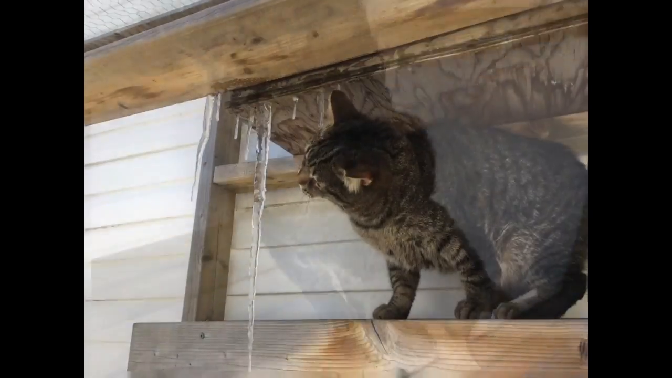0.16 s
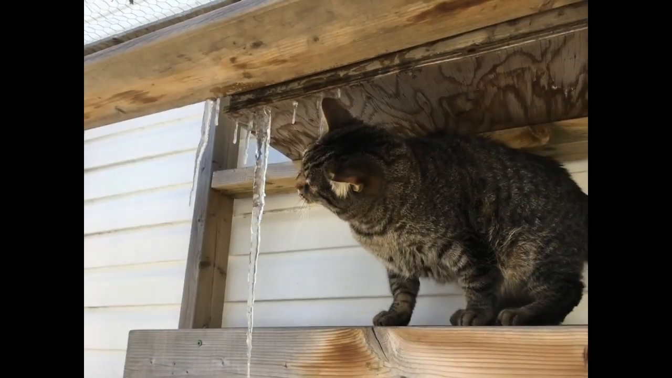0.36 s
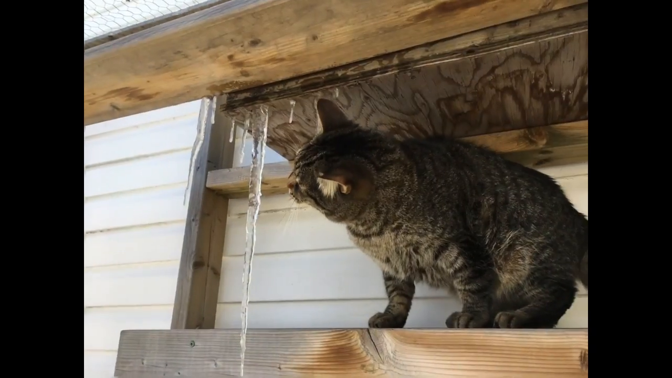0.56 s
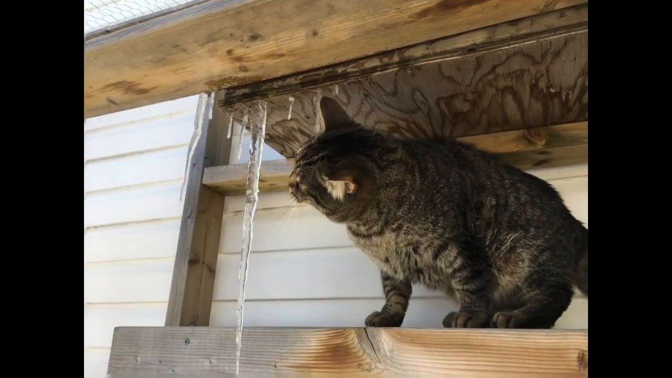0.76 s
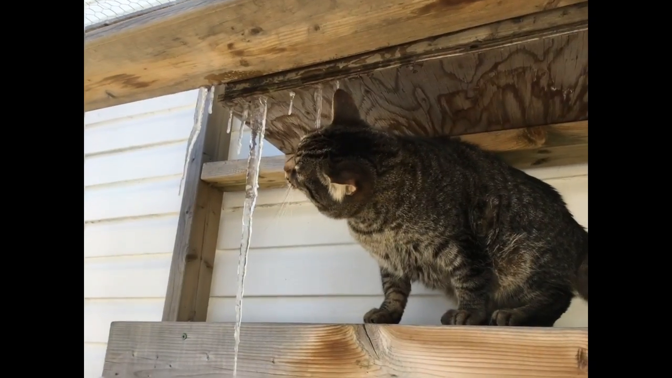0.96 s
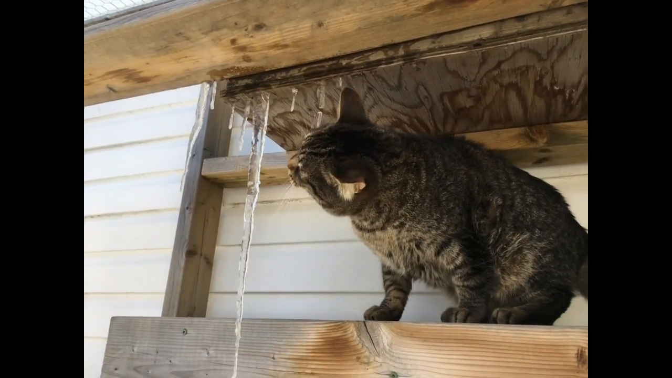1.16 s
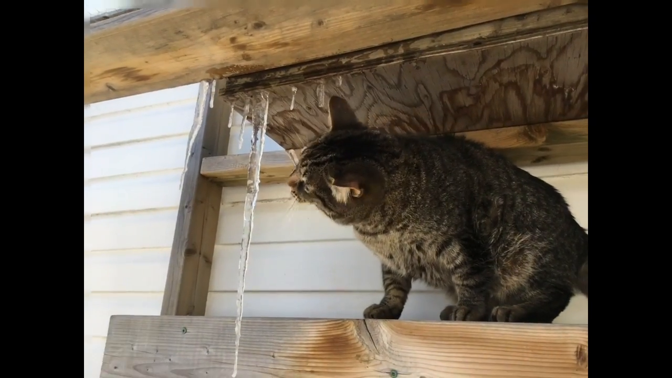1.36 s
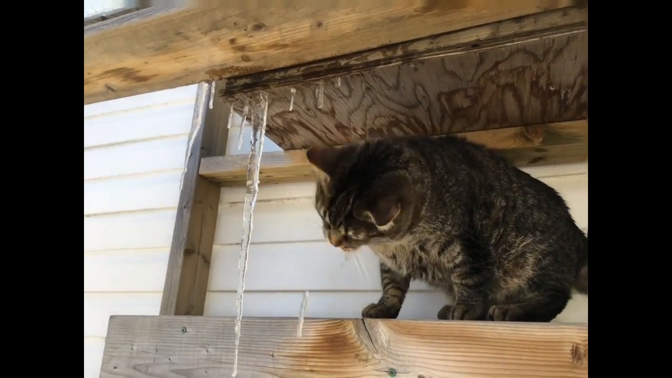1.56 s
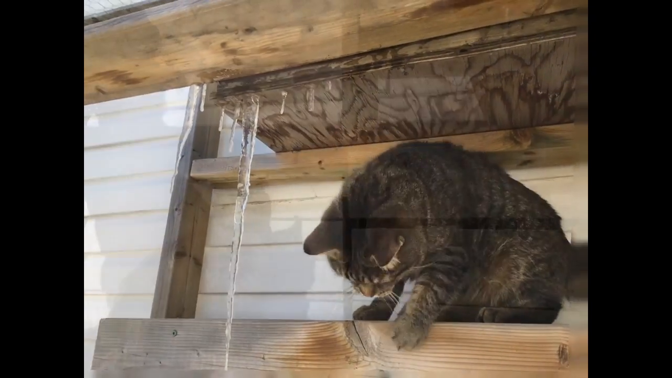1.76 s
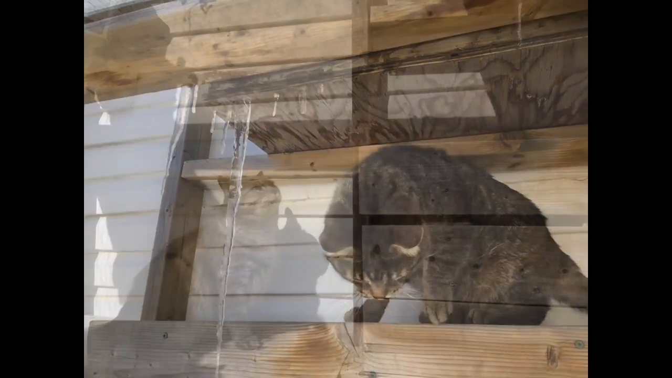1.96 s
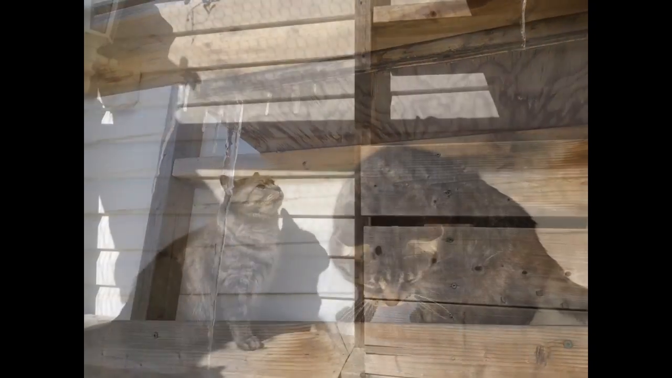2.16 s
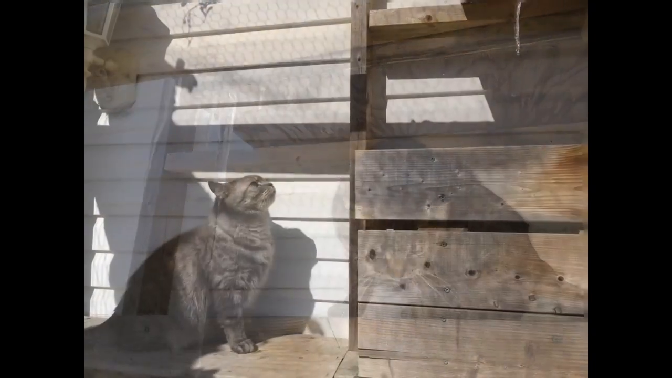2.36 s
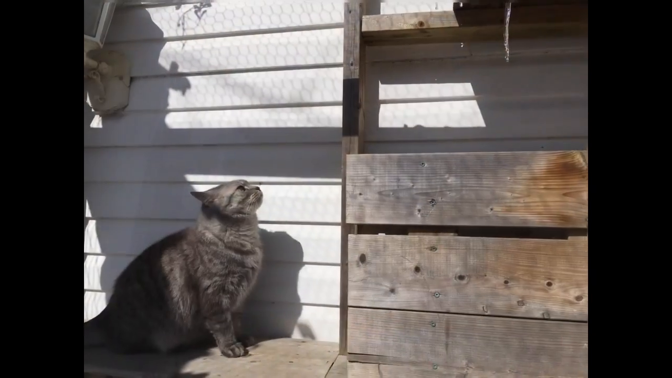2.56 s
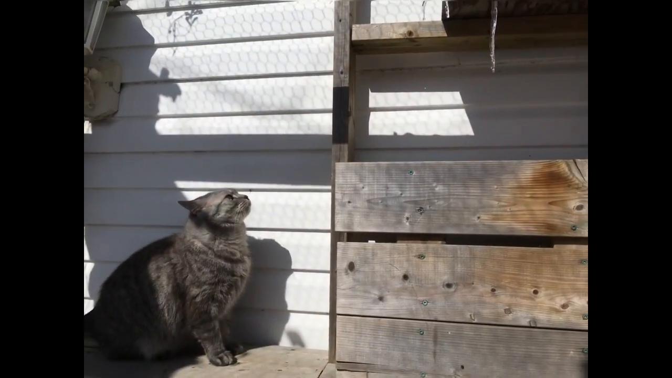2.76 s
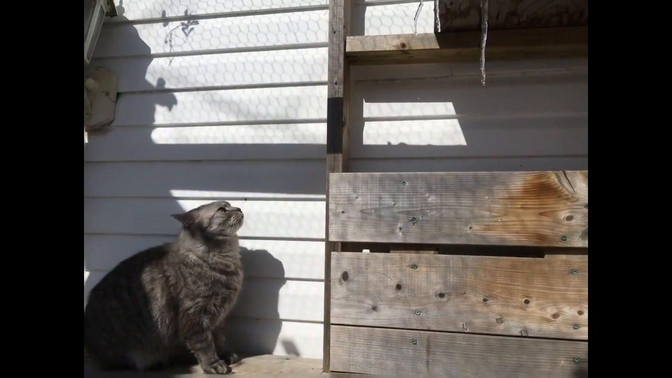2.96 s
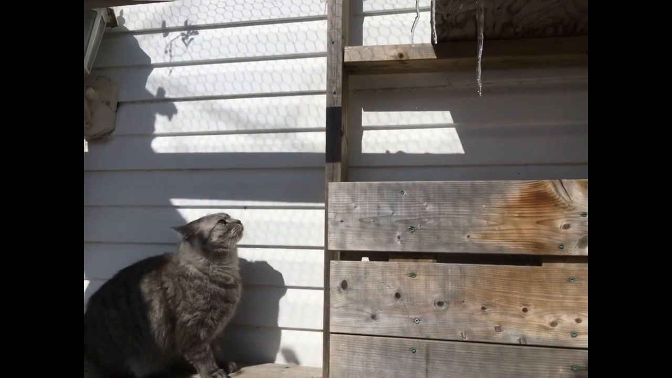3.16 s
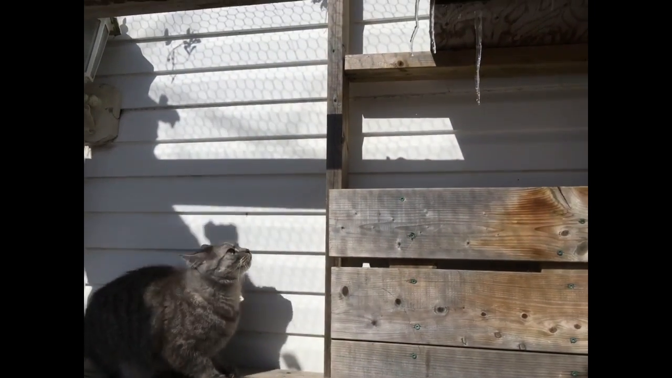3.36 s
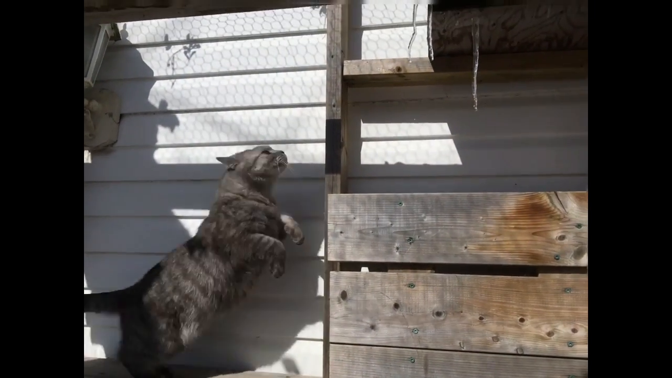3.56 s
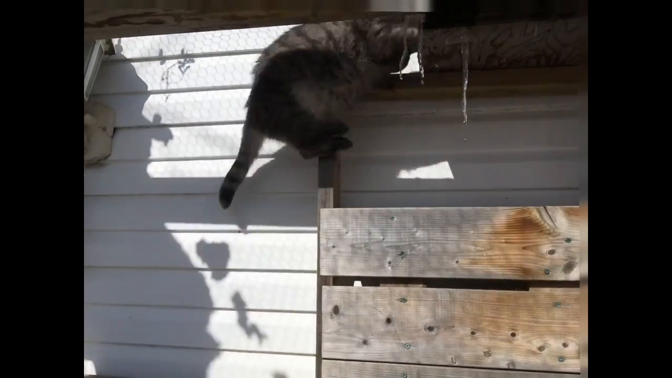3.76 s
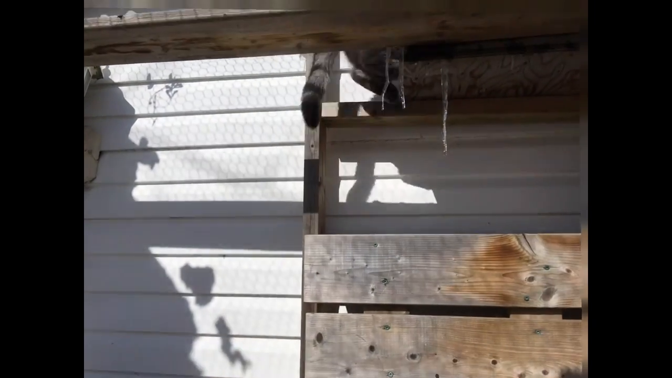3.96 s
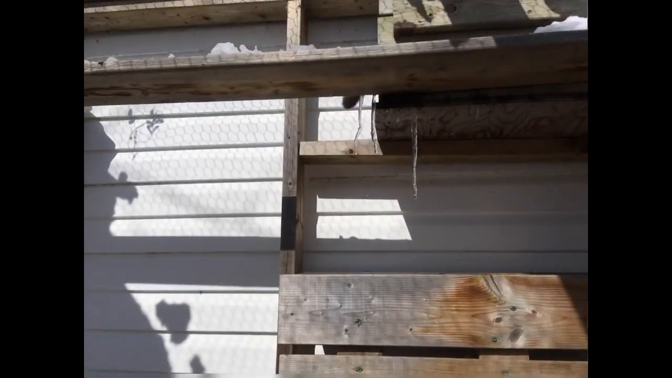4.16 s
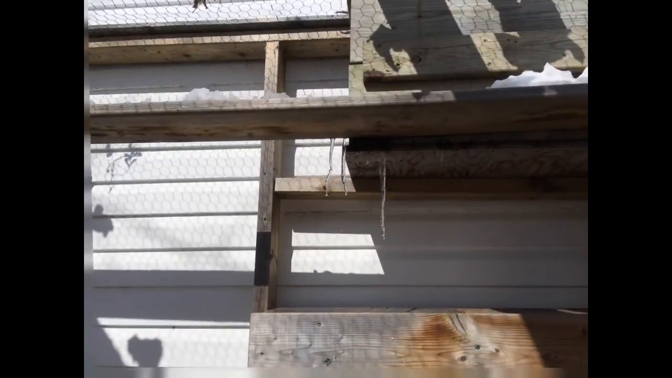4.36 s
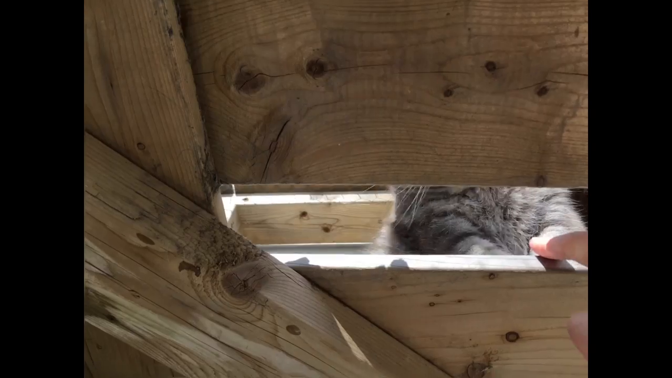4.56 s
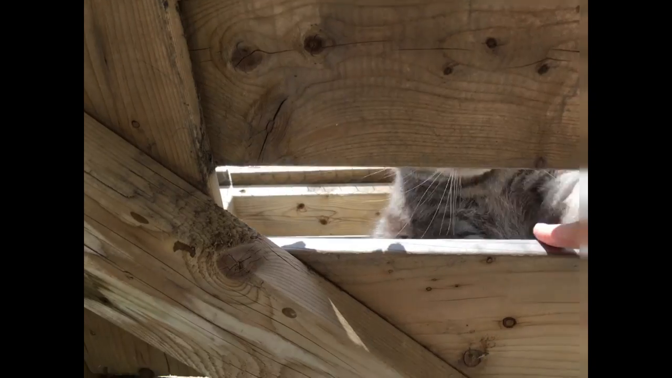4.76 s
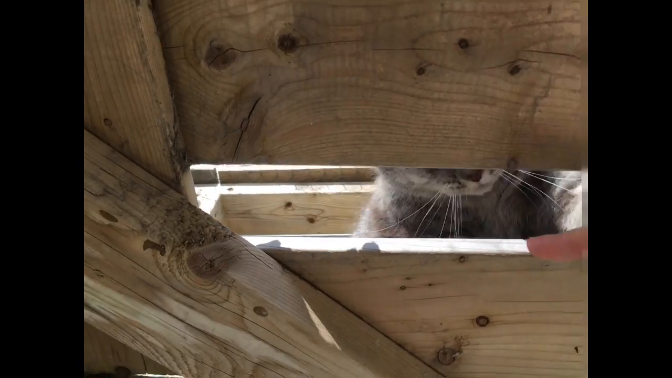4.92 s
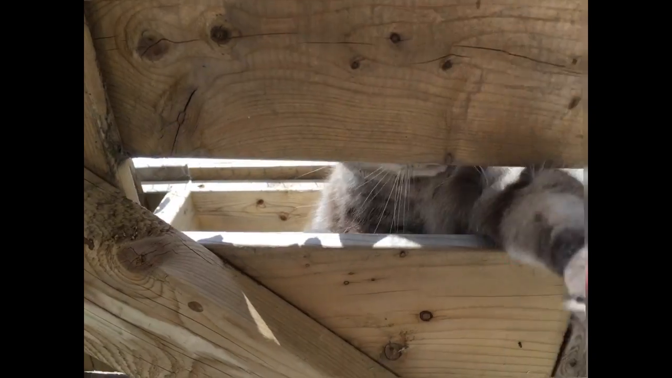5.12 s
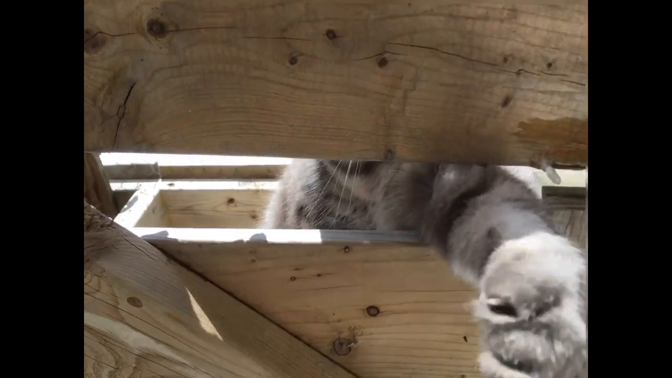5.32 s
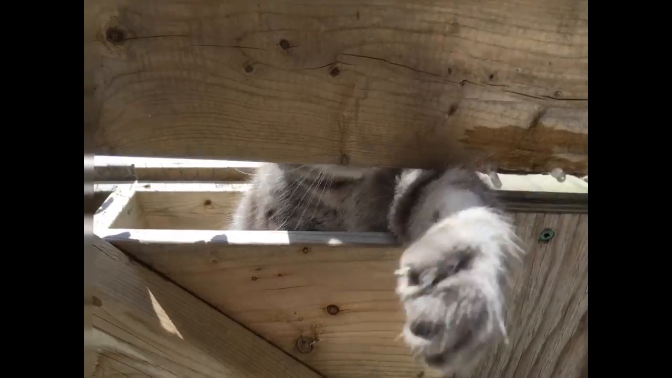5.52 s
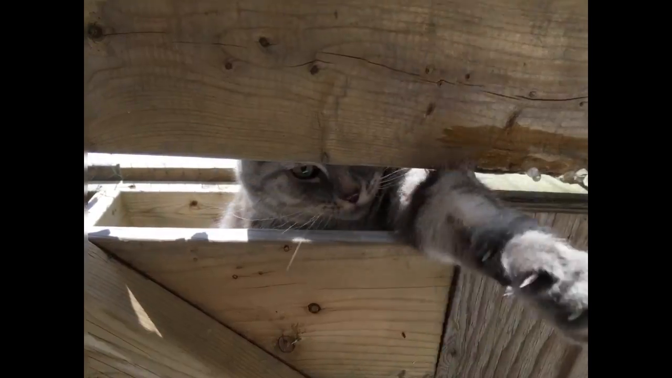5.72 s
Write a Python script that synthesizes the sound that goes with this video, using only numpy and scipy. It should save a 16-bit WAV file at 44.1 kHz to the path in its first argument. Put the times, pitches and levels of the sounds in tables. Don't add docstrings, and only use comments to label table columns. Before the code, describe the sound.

Ice clicks and crunches faintly over a low hum, snaps sharply and bounces on boards, then a cat's jump knocks, thumps and scrapes wood.

```python
import sys
import numpy as np
from scipy import signal
from scipy.io import wavfile
from scipy.ndimage import uniform_filter1d

SR = 44100
rng = np.random.default_rng(int(sys.argv[2]) if len(sys.argv) > 2 else 0)


def natural_amplitude(level_db):
    exponent = np.asarray(level_db, float) / 20
    return 10 ** exponent


def inscribe(sig):
    pcm = np.round(np.clip(np.atleast_2d(sig).T, -1, 1) * 32767)
    wavfile.write(sys.argv[1], SR, pcm.astype(np.int16))


N = 259656

# (lowest [Hz], highest [Hz])
PARTS_HZ = [(300, 1500), (1500, 6000), (6000, 16000)]
CHIP_STEADY, PIECE_STEADY = 0.35, 0.85


def unit(x):
    return x / np.sqrt(np.mean(x ** 2) + 1e-30)


def band(x, lo_hz, hi_hz, order=2):
    return signal.sosfilt(signal.butter(order, [lo_hz, hi_hz], "bandpass", fs=SR, output="sos"), x)


def add(out, s, piece):
    i = int(s * SR)
    out[i:i + len(piece)] += piece[:N - i]


def curve(rows):
    time_s, level_db = np.transpose(rows)
    return np.interp(np.arange(N) / SR, time_s, level_db, left=-120., right=-120.)


def walk(rate_hz):
    hold = int(SR / rate_hz)
    steps = np.repeat(rng.standard_normal(N // hold + 1), hold)
    return unit(uniform_filter1d(uniform_filter1d(steps, hold), hold)[:N])


def fade(t60, rise=0.0007):
    t = np.arange(SR // 4) / SR
    return t, (1 - np.exp(-t / rise)) * np.exp(-np.log(1000) * t / max(t60, 0.003))


def ring(hz, t60, rise=0.00022):
    t, gain = fade(t60, rise)
    return gain * np.sin(2 * np.pi * hz * t)


def rough_ring(hz, share, t60, steady=CHIP_STEADY, rise=0.0007):
    half = 1 + np.clip(share, 0.005, 0.8) / 2
    noise = band(rng.standard_normal(SR // 2), hz / half, min(hz * half, 20000))
    rough = unit(noise[SR // 4:])
    return np.sqrt(1 - steady ** 2) * rough * fade(t60, rise)[1] + steady * 1.4 * ring(hz, t60, rise)


def crack(db, low_db, high_db, t60, top_db=0.0):
    parts_hz = [*PARTS_HZ, (11000, 20000)]
    levels_db = (db + low_db, db, db + high_db, db + high_db + top_db)
    spike = natural_amplitude(1.5) * fade(0.005, 0.0001)[1]
    out = 0
    for hz, level_db, longer in zip(parts_hz, levels_db, (1.35, 0.98, 0.39, 0.6)):
        noise = unit(band(rng.standard_normal(SR // 4), *hz))
        out = out + natural_amplitude(level_db) * noise * (fade(t60 * longer, 0.0002)[1] + spike)
    return out


def small_contact(s, db, hz, click_db, t60, share, out):
    click = crack(db + click_db - 13.0, -7.0, -0.76, 0.97 * t60)
    add(out, s, natural_amplitude(db - 15) * rough_ring(hz, share, t60) + click)


def hum():
    # (time [s], level [dB])
    hum_level = [
        (0.0, -52.5),
        (0.66, -52.5),
        (1.85, -52.5),
        (2.05, -56),
        (2.24, -57.5),
        (2.36, -72),
        (2.51, -70),
        (2.7, -79.5),
    ]
    hum_hz, fan_hz, fan_db = 120.4, 578, -22
    t = np.arange(N) / SR
    tone = natural_amplitude(1.2 * walk(14)) * np.sin(2 * np.pi * hum_hz * t + 0.55 * walk(12))
    fan_phase = 2 * np.pi * np.cumsum(fan_hz + 1.2 * walk(6.1)) / SR
    fan = natural_amplitude(fan_db + 1.4 * walk(36)) * np.sin(fan_phase)
    return natural_amplitude(curve(hum_level)) * np.sqrt(2) * (tone + fan)


def air():
    # (pitch [Hz], level [dB])
    air_colour = [(100, -12.5), (264, -16.5), (439, -28), (578, -28.5), (1660, -37.5), (2700, -36.5),
                  (2940, -39.5), (15600, -43)]
    # (time [s], level [dB])
    roar = [
        (0, 11.5),
        (0.4, 4.5),
        (1.5, 9),
        (2.1, 5),
        (2.6, 0),
        (3.3, -0.5),
        (4.4, 1),
        (5.89, 1.5),
    ]
    hz_at, db_at = np.transpose(air_colour)
    out, lift, swell = 0, curve(roar), walk(1.4)
    for hz in 140 * 2 ** np.arange(0, 7.1, .5):
        share = np.clip(np.log2(2500 / hz) / 2.0, 0.3, 1)
        db = np.interp(np.log(hz), np.log(hz_at), db_at)
        db = db + share * (lift + 0.25 * swell) + 0.8 * walk(3.28)
        noise = unit(band(rng.standard_normal(N), hz / 2 ** 0.16, min(hz * 2 ** 0.29, 20000)))
        out = out + natural_amplitude(db) * np.sqrt(hz) * noise
    return natural_amplitude(-67) * unit(out)


def rumble():
    # (time [s], level [dB])
    breeze = [(0.0, -60.5), (0.49, -55), (1.5, -55.5), (2.43, -60.5), (2.85, -61), (3.3, -60.5), (3.4, -59),
              (3.67, -62), (3.79, -57.5), (3.87, -62.5), (4.1, -59), (4.56, -63.5), (5.0, -64), (5.49, -64),
              (5.57, -63), (5.66, -65.5), (5.89, -63)]
    strongest_hz = 60.0
    out = 0
    for hz in (12, 18, 24, 46, 56, 72, 95, 122):
        noise = unit(band(rng.standard_normal(N), hz / 1.4, hz * 1.21))
        out = out + natural_amplitude(-7.0 * abs(np.log2(hz / strongest_hz))) * noise
    return natural_amplitude(curve(breeze)) * unit(out)


def nibbles():
    # (time [s], peak [dB], ring pitch [Hz], bare click [dB], decay [s])
    bites = [(0.055, -57, 14800, 2, 0.04), (0.327, -49, 14300, -7.5, 0.043),
             (0.5414, -40.5, 6743, -20, 0.049), (0.5968, -54.5, 2520, 0.5, 0.034),
             (0.6238, -53.5, 2466, -6, 0.081), (0.647, -40.5, 8200, -16, 0.05),
             (0.679, -57.5, 2540, 6.5, 0.018), (0.6936, -41.5, 10300, -17, 0.034),
             (0.7442, -50, 2500, -8.5, 0.032), (0.8985, -44.5, 2800, -18, 0.063),
             (0.9096, -46, 3890, -14, 0.033), (1.0958, -40, 2500, -15, 0.066),
             (1.119, -62, 2440, -14, 0.035), (1.352, -49, 1900, -20, 0.051), (1.402, -52, 2780, -21, 0.044),
             (1.693, -58, 6500, -1, 0.044), (1.8181, -48.5, 3740, -11, 0.05),
             (1.8344, -48.5, 1640, -7, 0.026)]
    out = np.zeros(N)
    for s, db, hz, click_db, t60 in bites:
        small_contact(s, db, hz, click_db, t60, 0.23, out)
    return out


def contact(s, length, swell, end_db, roundness):
    away = np.arange(N) / SR - s
    away = np.where(away < 0, -away / (swell * length), away / ((1 - swell) * length))
    gain = natural_amplitude(end_db * np.minimum(away, 1) ** roundness) * np.clip(3 * (1 - away), 0, 1)
    return uniform_filter1d(gain, SR // 100)


def rubs():
    # (share of length that swells, level at the ends [dB], share of that fall in the highs, roundness)
    strokes, stroke_shape = [(0.125, 0.067, -74.5, 15.5, 1), (0.3, 0.34, -90.5, 17.5, -15),
                             (0.87, 0.12, -77.5, 7, -20), (1.38, 0.065, -90, -16, -22),
                             (2.7, 0.061, -73.5, -6, -16.5), (2.75, 0.082, -76, -4, -17),
                             (2.87, 0.15, -70, -6.5, -9), (2.94, 0.09, -76, -3.5, -12),
                             (3.04, 0.1, -71.5, 2.5, -13.5), (3.125, 0.13, -68.5, -1, -17.5),
                             (3.505, 0.097, -72.5, 0, -4), (3.87, 0.12, -75.5, 5, 9),
                             (3.93, 0.014, -66, 7, -2.5), (3.96, 0.042, -69, 5, 2),
                             (4.605, 0.083, -71.5, -1.5, 11), (4.68, 0.1, -94, -1, 8),
                             (4.745, 0.062, -74.5, -2.5, 10.5), (4.78, 0.057, -77, -6, 3),
                             (4.895, 0.12, -68.5, -1.5, 6), (5.015, 0.088, -73, 2.5, 3),
                             (5.13, 0.15, -77, -2, 5), (5.205, 0.078, -75.5, -2.5, 4),
                             (5.29, 0.1, -79, -3, 9.5), (5.365, 0.11, -77, -2.5, 6.5),
                             (5.548, 0.11, -77.5, 6.5, -2), (5.762, 0.29, -81.5, -2.5, 3.5)], (0.4, -14, 0.9, 1.7)
    brushes = [
        (3.7, 0.037, -51.5, -6.5, -5),
        (3.99, 0.04, -42, 0.5, -2),
    ]
    brush_shape = (0.98, -27.5, 0.9, 0.55)
    slides = [
        (1.24, 0.074, -57.5, -7.5, 9),
        (1.935, 0.13, -51.5, -4.5, 1),
        (2.1, 0.14, -56, 6, -5),
        (3.551, 0.18, -62, -0.5, -0.5),
        (3.72, 0.1, -53, -5, -7),
        (4.0, 0.033, -46, 8, -9.5),
        (4.022, 0.11, -66, 7.5, 0),
        (4.152, 0.049, -57, -16, 1),
        (4.978, 0.05, -82, -2.5, 19),
    ]
    slide_shape = (0.02, -34, 0.84, 0.68)
    rests = [
        (1.3, 0.41, -74.5, -4, 2.2),
        (4.6, 0.84, -82.5, -2, 5.3),
    ]
    rest_shape = (0.03, -3.0, 0.9, 1.01)
    hollow_db = 2.2

    hiss = rng.standard_normal(N)
    grain = natural_amplitude(0.77 * rng.exponential(size=N) + 2.0 * walk(45) + 1.6 * walk(160))
    edges = 1500 * 2 ** np.arange(0, 3.6, .125)
    strips = []
    for lo, hi in zip(edges, edges[1:]):
        strip = unit(band(np.roll(hiss, int(lo)) * grain, lo, hi))
        strips.append(strip * natural_amplitude(hollow_db * walk(9.8)) * (hi - lo) ** 0.25)
    strips = np.array(strips)
    body = natural_amplitude(-7.0 * np.log2(edges[:-1] / 2500) ** 2)
    sheen = 1 / (1 + (5500 / edges[:-1]) ** 2.9)
    low = unit(band(hiss * grain, *PARTS_HZ[0]))
    mid, high = unit(body @ strips), unit(sheen @ strips)

    out = 0
    kinds = ((strokes, stroke_shape), (brushes, brush_shape), (slides, slide_shape), (rests, rest_shape))
    for rows, (swell, end_db, high_share, roundness) in kinds:
        for s, length, db, low_db, high_db in rows:
            gain = contact(s, length, swell, end_db, roundness)
            high_gain = contact(s, length, swell, high_share * end_db, roundness)
            out = out + natural_amplitude(db) * gain * (mid + natural_amplitude(low_db) * low)
            out = out + natural_amplitude(db + high_db) * high_gain * high
    return out


def ticks():
    # (time [s], peak at 1.5-6 kHz [dB], ring pitch [Hz], low part [dB], decay [s])
    knocks = [(0.102, -75, 1300, 24, 0.037), (0.1126, -61.5, 800, 13.5, 0.056), (0.843, -66, 1040, 2, 0.14),
              (1.1027, -60.5, 933, 14, 0.034), (1.4, -59, 14500, -22, 0.047),
              (1.5196, -53, 14900, -30, 0.029), (1.727, -33.5, 6120, -8, 0.038),
              (1.7602, -53.5, 1394, 9, 0.07), (1.9772, -35, 928, 0, 0.01),
              (2.2978, -48.5, 13100, -14.5, 0.14), (2.3243, -58, 14500, 6.5, 0.082),
              (2.4082, -55, 836, 5, 0.1), (3.5143, -58, 1020, 2.5, 0.16), (3.549, -53, 1630, 2, 0.055),
              (3.5601, -51, 9100, -5, 0.025), (3.697, -43, 3460, -6.5, 0.047),
              (3.7042, -28.5, 5640, -38, 0.032), (3.9251, -56, 1010, -1, 0.11),
              (3.9923, -29, 9750, -5, 0.025), (4.1942, -42.5, 5520, -10, 0.09),
              (5.301, -54, 13500, -14, 0.047), (5.3167, -39.5, 11400, -11.5, 0.012)]
    out = np.zeros(N)
    for s, db, hz, low_db, t60 in knocks:
        high_db = -5 + 7.5 * max(hz / 15000 - 0.6, 0) / 0.3
        ring_db = db + (high_db if hz > 6000 else low_db if hz < 1500 else 0)
        steady = 0.75 if hz < 1500 else CHIP_STEADY
        knock = natural_amplitude(-7.5) * crack(db, low_db, high_db, t60)
        add(out, s, knock + natural_amplitude(ring_db - 6.5) * rough_ring(hz, 0.11, 0.87 * t60, steady))
    return out


def plain_rings(rows, share, steady):
    out = np.zeros(N)
    for s, db, hz, t60 in rows:
        add(out, s, natural_amplitude(db) * rough_ring(hz, share * min(4360 / hz, 1), t60, steady))
    return out


def thuds():
    # (time [s], peak [dB], pitch [Hz], decay [s])
    answers = [(0.11, -44, 295, 0.097), (0.85, -70, 12400, 0.089), (1.214, -43.5, 1190, 0.032),
               (1.727, -31, 3420, 0.012), (1.7268, -22.5, 7450, 0.0061), (1.761, -38, 3920, 0.009),
               (1.775, -58, 1510, 0.04), (1.831, -45.5, 254, 0.062), (1.9253, -48, 513, 0.049),
               (2.03, -54, 226, 0.31), (2.278, -62, 6250, 0.026), (2.299, -59, 3920, 0.044),
               (2.3, -48.5, 9500, 0.031), (2.409, -52.5, 2290, 0.043), (2.412, -56, 990, 0.054),
               (2.584, -60.5, 2174, 0.036), (3.04, -65, 2580, 0.046), (3.56, -65, 2000, 0.024),
               (3.705, -38, 2065, 0.043), (3.705, -31, 3530, 0.025), (4.0, -49, 598, 0.13),
               (4.151, -42.5, 3000, 0.034), (4.201, -61, 269, 0.2), (5.3164, -29, 15200, 0.0071),
               (5.535, -60.5, 620, 0.049), (5.536, -67.5, 2600, 0.069)]
    return plain_rings(answers, 0.49, CHIP_STEADY)


def bumps():
    # (time [s], peak [dB], pitch [Hz], decay by 60 dB [s])
    thumps = [(0.119, -49, 110, 0.065), (1.928, -39.5, 256, 0.092), (1.979, -17, 142, 0.0093),
              (2.507, -40.5, 60, 0.1), (2.568, -42, 67.7, 0.089), (3.38, -41, 77.7, 0.08),
              (3.707, -41.5, 250, 0.05), (3.988, -39.5, 196, 0.1), (4.008, -51.5, 211.4, 0.22),
              (4.199, -56, 48.4, 0.056), (5.55, -46, 53.8, 0.061)]
    out = np.zeros(N)
    for s, db, hz, t60 in thumps:
        add(out, s, natural_amplitude(db + 5) * ring(hz, t60, rise=0.0091))
    return out


def squeaks():
    # (time [s], length [s], pitch [Hz], level [dB])
    notes_sung = [
        (0.729, 0.033, 1150, -74),
        (1.352, 0.045, 2230, -69),
        (1.103, 0.014, 860, -60),
        (1.4, 0.013, 15000, -62),
        (1.372, 0.035, 3100, -75.5),
        (3.8, 0.061, 1340, -61),
        (3.98, 0.027, 10000, -56),
        (3.987, 0.016, 4100, -53),
    ]
    t, out = np.arange(N) / SR, 0
    waver, flutter = 1 + 0.012 * walk(90), natural_amplitude(2.5 * walk(200))
    for s, length, hz, db in notes_sung:
        hold = np.clip((t - s) / 0.0018, 0, 1) * np.clip((s + length - t) / 0.0063, 0, 1)
        out = out + natural_amplitude(db + 6.5) * hold * flutter * np.sin(2 * np.pi * hz * np.cumsum(waver) / SR)
    return out


def pings():
    # (time [s], peak [dB], pitch [Hz], decay [s])
    chips = [(0.742, -67, 5430, 0.046), (1.097, -61, 4990, 0.041), (1.191, -65, 2960, 0.063),
             (1.7605, -56, 14700, 0.05), (2.326, -51.5, 2460, 0.015), (2.515, -63, 15350, 0.044),
             (2.583, -60.5, 14900, 0.038), (3.995, -40.5, 4180, 0.024), (4.283, -38.5, 1940, 0.058),
             (4.283, -48, 688, 0.045), (5.317, -53, 2900, 0.058)]
    return plain_rings(chips, 0.19, PIECE_STEADY)


def snaps():
    # (time [s], peak [dB], low part [dB], high part [dB], crack decay [s])
    breaks = [
        (1.2128, -24, -11.5, -8, 0.042),
        (1.917, -24, -3, -10, 0.11),
        (1.924, -29.5, -8.5, 4.5, 0.11),
        (2.0262, -26, -7.5, -5.5, 0.097),
        (2.0549, -26, -12.5, -12.5, 0.092),
        (2.0909, -37.5, -4, -1, 0.097),
    ]
    # (pitch [Hz], level [dB], decay by 60 dB [s])
    pieces = [
        [(2906, -16, 0.026), (3390, -23.5, 0.031), (2900, -36, 0.064), (9230, -25, 0.026),
         (12030, -15.5, 0.003), (14060, -38, 0.033), (4730, -31, 0.0087), (5870, -28.5, 0.008)],
        [(9470, -27.5, 0.05), (2880, -28, 0.015), (1900, -30, 0.02)],
        [(964, -31, 0.06), (1435, -37, 0.074), (5335, -29.5, 0.039), (6000, -32, 0.04), (14540, -24, 0.045),
         (14900, -33.5, 0.046), (13750, -32.5, 0.018), (2500, -35.5, 0.032), (3300, -31.5, 0.026)],
        [(2680, -30.5, 0.016), (6930, -34, 0.0059), (3460, -47, 0.027)],
        [(15250, -30.5, 0.012), (15220, -44, 0.085), (6500, -28.5, 0.018), (3470, -32, 0.013),
         (1640, -45, 0.036), (930, -44, 0.056)],
        [(14500, -28, 0.0061), (14650, -52, 0.13), (2466, -43, 0.022), (1300, -45, 0.073)],
    ]
    out = np.zeros(N)
    ends = [row[0] for row in breaks[1:]] + [N / SR]
    for k, ((s, db, low_db, high_db, t60), modes, end) in enumerate(zip(breaks, pieces, ends)):
        top_db = (-11 if k else 8.5) - high_db
        add(out, s, natural_amplitude(-8.5) * crack(db, low_db, high_db, t60, top_db))
        shake = 0.24 * rng.standard_normal(SR // 50) * fade(0.011)[1][:SR // 50]
        shake[0] = 1
        shake = shake / np.sqrt(np.sum(shake ** 2))
        body = sum(natural_amplitude(d) * rough_ring(hz, 0.04, t, PIECE_STEADY, rise=0.0003) for hz, d, t in modes)
        body = body * np.clip((end - s - np.arange(len(body)) / SR) / 0.001, 0.12, 1)
        add(out, s + 0.0003, signal.fftconvolve(body, shake))
    return out


def clicks():
    # (time [s], peak [dB], brightness [Hz])
    releases = [(1.2135, -12, 12000), (1.2165, -20, 4980), (1.7265, -24, 6030), (1.9243, -12.5, 8970),
                (1.926, -22, 9100), (1.9283, -20.5, 6980), (1.933, -24, 9000), (1.9775, -30.5, 9000),
                (2.0263, -26, 6000), (2.0271, -25, 5000), (2.0546, -23.5, 5980), (2.0585, -37, 4000),
                (3.7047, -18.5, 11950), (3.7079, -26, 4970), (3.9932, -21, 8000), (4.0003, -31, 1200),
                (4.1525, -42, 5000), (4.2895, -32, 6980), (5.3144, -46, 9030)]
    out = np.zeros(N)
    for s, db, hz in releases:
        pulse = band(np.eye(1, 200)[0], hz / 3, min(hz * 1.6, 20000), order=1)
        add(out, s, natural_amplitude(db) * pulse / np.max(abs(pulse)))
    return out


def crumbs():
    # (time [s], peak [dB], ring pitch [Hz], bare click [dB])
    taps = [(2.1906, -48, 1880, -13), (2.4837, -50, 1980, -24.5), (2.5135, -51.5, 6000, -13),
            (2.523, -66, 9000, 4), (2.536, -65, 2510, 7), (2.7674, -57, 2800, 1), (4.0443, -49.5, 2160, -3),
            (4.0604, -54, 5600, -9), (4.0973, -53.5, 5640, -4.5), (4.1495, -28.5, 7550, -27),
            (4.166, -35, 6820, -16), (4.374, -58, 6100, 1), (4.4454, -55.5, 2270, -9),
            (4.4903, -53, 2180, 1.5), (4.526, -54, 2260, 0.5), (4.979, -43.5, 13600, -15),
            (5.128, -54, 14300, -8)]
    out = np.zeros(N)
    for s, db, hz, click_db in taps:
        small_contact(s, db, hz, click_db, 0.05, 0.42, out)
    return out


def drag():
    # (time [s], level [dB])
    effort = [
        (4.196, -49),
        (4.206, -52),
        (4.233, -50.5),
        (4.277, -49.5),
        (4.281, -42.5),
        (4.29, -37.5),
        (4.305, -44.5),
        (4.319, -53.5),
        (4.335, -82),
    ]
    # (pitch [Hz], width [Hz], level [dB])
    plank_modes = [(1230, 200, -7), (1940, 260, -2), (2690, 240, -2), (3200, 260, -4.5), (4580, 110, -2.5),
                   (5190, 263, 1.5), (5800, 180, 0), (6320, 180, -1), (7090, 220, -8), (7760, 380, -3),
                   (9180, 210, -8), (9780, 250, -7), (11800, 1200, -8.5), (14270, 3400, -11.5)]
    slip_hz, roughness = 652, 0.33

    def plank(x):
        return sum(natural_amplitude(d) * band(x, hz - w / 2, hz + w / 2, order=1) * np.sqrt(500 / w) for hz, w, d in plank_modes)

    jitter, grit = walk(400), rng.standard_normal(N)
    phase = np.cumsum(slip_hz * (1 + 0.15 * roughness * jitter)) / SR
    slips = np.diff(np.floor(phase), prepend=0) * np.sqrt(SR / slip_hz) * natural_amplitude(1.2 * jitter)
    scrape = 3.06 * roughness * grit * natural_amplitude(3.2 * walk(250))
    push = uniform_filter1d(natural_amplitude(curve(effort)), SR // 300) * (slips + scrape)
    return natural_amplitude(-5.0) * plank(push) / np.std(plank(grit))


def shelter(x):
    t60_s, level_db = 0.084, -18
    echo = 0
    for hz, longer in zip(PARTS_HZ, (1.3, 1.0, 0.75)):
        echo = echo + band(rng.standard_normal(SR // 4), *hz) * fade(t60_s * longer, 0.012)[1]
    return natural_amplitude(level_db) * signal.fftconvolve(x, echo / np.sqrt(np.sum(echo ** 2)))[:N]


def scene():
    sharp = nibbles() + ticks() + thuds() + squeaks() + pings() + snaps() + clicks() + crumbs() + drag()
    dip = 1 - 0.9 * np.clip(1 - abs(np.arange(N) / SR - 4.569) / 0.012, 0, 1)
    background = dip * (rumble() + air())
    return (sharp + shelter(sharp) + rubs() + bumps() + hum() + background)[None, :]


def top_cut(x):
    return signal.sosfilt(signal.butter(12, 16640, fs=SR, output="sos"), x)


def record(dry):
    # (pitch [Hz], width [Hz], level [dB])
    mic_peaks = [(2800, 1500, 0.5), (4820, 920, -4), (10270, 310, -5.5), (13100, 4600, 4.5)]
    for hz, width, db in mic_peaks:
        dry = dry + (natural_amplitude(db) - 1) * band(dry, hz - width / 2, hz + width / 2, order=1)
    mix = signal.sosfilt(signal.ellip(8, .2, 60, 15650, fs=SR, output="sos"), dry)
    return top_cut(mix)


dry = scene()
out = record(dry)
inscribe(out)
```